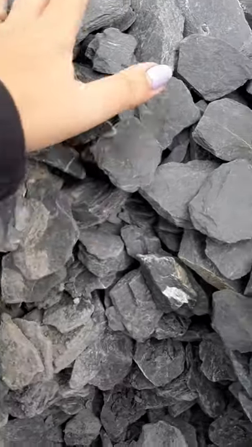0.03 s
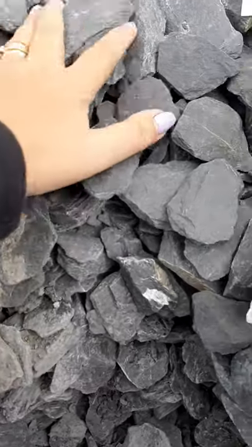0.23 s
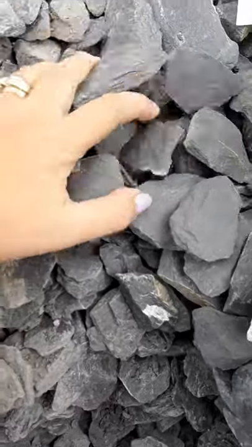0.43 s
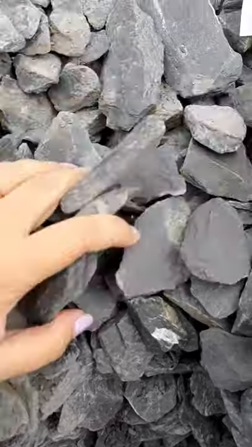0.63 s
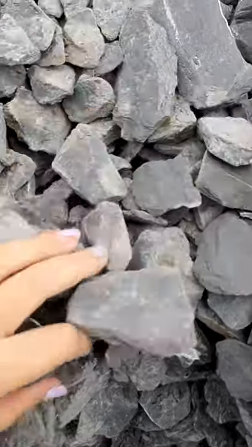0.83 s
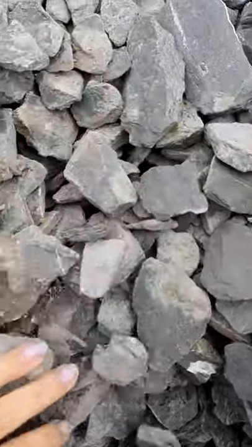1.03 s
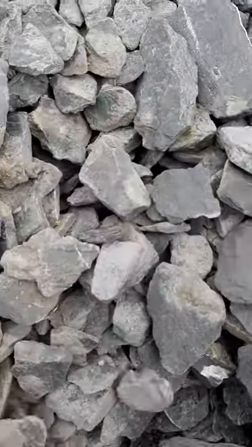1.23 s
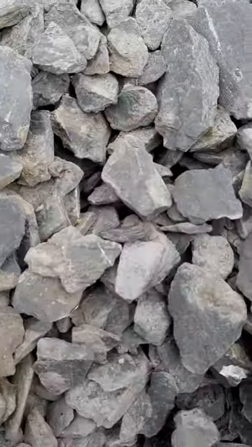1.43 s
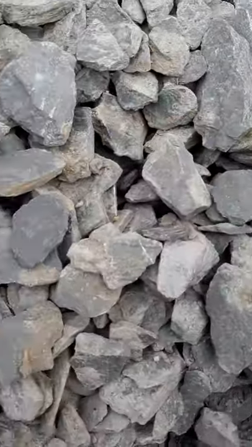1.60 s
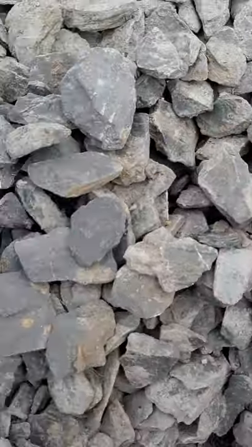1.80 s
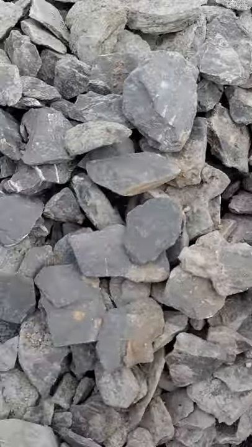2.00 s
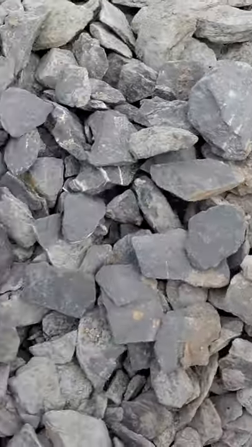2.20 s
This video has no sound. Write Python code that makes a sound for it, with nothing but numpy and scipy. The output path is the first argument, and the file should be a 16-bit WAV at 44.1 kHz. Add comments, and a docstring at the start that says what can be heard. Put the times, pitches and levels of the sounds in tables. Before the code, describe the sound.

Loose slate pieces clack, scrape and grind up close as a hand drags them down a pile outdoors. The last few tumble and settle with a soft scrape, leaving a low machine hum and faint hiss.

```python
"""A light tick of slate over a low machine hum and faint outdoor hiss; then, up close, a hand
drags loose chippings down a pile. Stone faces stick and slip in a grind of tiny contacts,
sliding edges squeak, and damped plates clack and chatter over the dull shifting of the pile.
A last few pieces tumble on and settle with a soft scrape, leaving the hum and the air."""
import sys
import numpy as np
from scipy import signal
from scipy.fft import rfft, irfft
from scipy.io import wavfile

SR = 44100
rng = np.random.default_rng(int(sys.argv[2]) if len(sys.argv) > 2 else 0)


def bounce(signal):
    """Save signal as a 16-bit WAV file at the path given by the first command-line argument."""
    frames = np.transpose(np.atleast_2d(signal))
    limited = np.clip(frames, -1, 1)
    pcm = np.round(limited * 32767).astype(np.int16)
    wavfile.write(sys.argv[1], SR, pcm)


N = 103635
TIME = np.arange(N) / SR

# The hand's drag down the pile: time_s, grit_db, dust_db, pan_db (left minus right)
DRAG = [(0, -76, -82, -11), (.178, -81, -56, 5), (.187, -48, -40, 6), (.27, -36, -41.5, 7),
        (.39, -50, -46.5, 5.5), (.455, -29, -36.5, 5), (.49, -37, -48, 7), (.54, -34.5, -36.5, 3.5),
        (.64, -38, -50, 1), (.71, -40, -46.5, 2.5), (.81, -37.5, -41, 3), (.885, -43, -45, 5.5),
        (.935, -39.5, -41, -1), (1.0, -42.5, -53, 3), (1.06, -35.5, -39.5, 4), (1.16, -40, -47, -1),
        (1.25, -49, -53, -4), (1.335, -40.5, -50, -3), (1.37, -51.5, -56, -1), (1.43, -48.5, -59, -3),
        (1.47, -57, -70, -5), (1.53, -45.5, -71, -6), (1.62, -62, -83, 2)]


def amp(db):
    """Decibels to gain."""
    return 10 ** (np.asarray(db) / 20)


def unit(x):
    """Scales to rms 1."""
    return x / np.sqrt(np.mean(x ** 2) + 1e-20)


def spectrum_at(points, hz):
    """Reads a spectrum table along a log-frequency axis."""
    point_hz, value = np.transpose(points)
    return np.interp(np.log(hz + 1), np.log(point_hz + 1), value)


def curve(points, column=1):
    """One column of a time table, drawn out to every sample."""
    table = np.transpose(points)
    return np.interp(TIME, table[0], table[column])


def pan(pan_db):
    """Left and right gains of mean power 1; positive leans left."""
    gains = amp(np.array([[.5], [-.5]]) * pan_db)
    return gains / np.sqrt((gains ** 2).mean(0))


def add(mix, start_s, sound):
    """Drops a stereo sound into the mix."""
    part = mix[:, max(round(start_s * SR), 0):][:, :sound.shape[1]]
    part += sound[:, :part.shape[1]]


def wander(rate_hz):
    """Random drift of rms 1, rolled off above the given rate."""
    hz = np.fft.rfftfreq(N, 1 / SR)
    return unit(irfft(rfft(rng.standard_normal(N)) / (1 + (hz / rate_hz) ** 4), N))


def colour(x, eq):
    """Shapes two channels with an EQ, drawing the upper bass towards mono."""
    # How alike the channels are: freq_hz, correlation
    likeness = [(30, 0), (130, 1), (300, 0.76), (700, 0.15), (1500, 0), (16000, 0)]
    hz = np.fft.rfftfreq(N, 1 / SR)
    same = spectrum_at(likeness, hz)
    left, right = rfft(x)
    right = same * left + np.sqrt(1 - same ** 2) * right
    return unit(irfft(np.array([left, right]) * amp(spectrum_at(eq, hz)), N))


def noise(eq):
    """Coloured stereo noise of rms 1."""
    return colour(rng.standard_normal((2, N)), eq)


def machine_hum():
    """A distant machine drones in low tones, each wavering in pitch and level."""
    # The machine's tones: pitch_hz, level_db
    tones = [(52, -74), (74.8, -49), (186, -63), (223, -70.5), (297, -86), (323, -70.5), (372.6, -64.5)]
    # Slow swell over all the tones: time_s, gain_db
    swell = [(0, 3), (.25, 4), (.65, 2), (1.0, -0.5), (1.5, -3), (2.1, -1.5), (2.35, 1.5)]
    hum = np.zeros(N)
    for hz, db in tones:
        peak = amp(db + .4 * wander(3)) * np.sqrt(2)
        cycles = np.cumsum(hz + .4 * wander(2.5)) / SR + rng.random()
        hum += peak * np.sin(2 * np.pi * cycles)
    return hum * amp(curve(swell))


def outdoor_air():
    """A steady low bed of air under a faint hiss that swells and dips."""
    # Colours of the air and the hiss: freq_hz, gain_db
    air_eq = [(20, -41), (38, -17), (60, 6.5), (115, -0.5), (200, -2), (450, -11), (900, -9), (1900, -8),
              (3000, -34), (16000, -70)]
    hiss_eq = [(200, 1.5), (800, 2.5), (2200, 4.5), (4500, -1.5), (7300, -5), (9000, -11.5), (13000, -10.5),
               (16000, -9)]
    # Rise and fall of the hiss: time_s, level_db
    hiss_level = [(0, -52.5), (.16, -49), (1.0, -49), (1.55, -53), (1.72, -62.5), (1.8, -65), (1.89, -58.5),
                  (1.95, -49), (2.06, -53), (2.17, -52), (2.29, -48.5), (2.35, -52)]
    return amp(-56.5) * noise(air_eq) + amp(curve(hiss_level)) * noise(hiss_eq)


def pile_shift():
    """The pile shifts under the hand with a dull rumble."""
    # Weight of the movement: time_s, level_db
    movement = [(0, -49.5), (.2, -54), (.255, -45), (.33, -51), (.47, -45.5), (.62, -49), (.85, -51.5),
                (1.0, -51), (1.09, -51), (1.2, -52.5), (1.55, -59), (1.69, -51.5), (1.78, -58),
                (2.35, -61.5)]
    # Colour of the rumble: freq_hz, gain_db
    rumble_eq = [(50, -11), (110, -4.5), (190, -1), (260, -3), (340, -9.5), (500, -13.5), (1000, -13.5),
                 (3000, -36)]
    return amp(curve(movement)) * noise(rumble_eq)


def minimum_phase(gain):
    """The sharpest-starting response with this magnitude."""
    log_gain = np.log(np.maximum(np.r_[gain, gain[-2:0:-1]], 1e-5))
    return np.exp(np.conj(signal.hilbert(log_gain)))[:len(gain)]


def clack(level_db, ring_hz, body_db, treble_db, pan_db, chatter_t60_s, size=4096):
    """One contact, its chatter and its scatter in the pile excite a heavily damped plate."""
    # Colour of struck slate: freq_hz, gain_db
    slate_eq = [(60, -20), (250, -15), (700, -18), (1300, -12), (2300, -6), (3600, 0.5), (5500, -1),
                (7800, -0.5), (9500, -10), (11300, -8), (13200, -11), (16000, -13.5)]
    # Modes of a plate: ratio to ring pitch, gain_db
    plate_modes = [(1, 10.5), (1.3, 5.5), (1.52, 0.5)]
    ring_width_hz, rise_s, scatter_t60_s, max_lag_s = 730, .002, .03, .0004
    t, hz = np.arange(size) / SR, np.fft.rfftfreq(size, 1 / SR)
    resonance = sum(amp(2 * db) / (1 + (2 * (hz - ratio * ring_hz) / ring_width_hz) ** 2)
                    for ratio, db in plate_modes)
    plate = amp(spectrum_at(slate_eq, hz)) * np.sqrt(1 + resonance)
    # Balance body and treble against the core of the clack.
    body, core, treble = (hz > 700) & (hz < 2500), (hz > 2500) & (hz < 8500), (hz > 9000) & (hz < 15500)
    low, mid, high = (10 * np.log10(np.mean(plate[band] ** 2)) for band in (body, core, treble))
    shelves = [(2000, body_db - low + mid), (3200, 0), (7800, 0), (9500, treble_db - high + mid)]
    plate *= amp(spectrum_at(shelves, hz))
    chatter, scatter = rng.standard_normal((2, 2, size)) * (1 - np.exp(-t / rise_s))
    chatter_gain = amp(1) * np.sqrt(chatter_t60_s / .0075)  # longer chatter carries more energy
    chatter = chatter_gain * unit(chatter * amp(-60 * t / chatter_t60_s))
    scatter = amp(-12.5) * unit(scatter * amp(-60 * t / scatter_t60_s))
    hit = (chatter + scatter) / np.sqrt(size)
    hit[:, 0] += pan(.59 * pan_db)[:, 0]  # the contact itself: a one-sample click
    struck = rfft(hit) * minimum_phase(plate)
    struck /= np.sqrt(2 * np.mean(abs(struck[:, core]) ** 2, axis=1, keepdims=True))
    # The far channel hears it a little late.
    lag_s = np.maximum(np.array([[-1], [1]]) * np.clip(pan_db / 8, -1, 1) * max_lag_s, 0)
    delay = np.exp(-2j * np.pi * hz * np.round(lag_s * SR) / SR)
    return amp(level_db) * pan(pan_db) * irfft(struck * delay)


def clacks():
    """Chippings knock together, crowding during the drag and thinning out after it."""
    # Slate hitting slate: start_s, level_db, ring_hz, body_db, treble_db, pan_db, chatter_t60_s
    knocks = [(0.0279, -14, 6860, 1.5, -15, -10, 0.01), (0.2568, -7, 4900, -2, -18, 9, 0.0062),
              (0.2619, 6, 3500, -0.5, -23, 7, 0.01), (0.2992, -6.5, 4300, 0, -14, 4, 0.0068),
              (0.42, -2.5, 3570, 2.5, -20, 3, 0.023), (0.4399, 11.5, 3800, -7.5, -14, 6, 0.01),
              (0.449, 14.5, 6130, -16, -17.5, 10.5, 0.007), (0.458, 3, 4390, -9, -15, 13, 0.017),
              (0.4623, -11, 3660, -10, -14, 12, 0.021), (0.4684, -4, 2770, -11, -16, 7, 0.029),
              (0.506, 11, 5100, -7.5, -19, 8, 0.0072), (0.5222, 0.5, 4430, -11, -14, 5.5, 0.021),
              (0.5497, 4, 3560, -6, -25, 0, 0.011), (0.573, -2.5, 4830, -6, 2, 2.5, 0.012),
              (0.5946, 5.5, 5430, -11, -12, 6, 0.012), (0.606, 0, 5150, -6, -18, 5, 0.0098),
              (0.61, 4, 6330, -12, -14, 9, 0.012), (0.6336, 4, 4700, -2, -11, 5, 0.034),
              (0.6528, 6.5, 6100, -8, -17, 2, 0.0085), (0.6888, 2, 4270, -13.5, -7, 5.5, 0.017),
              (0.693, 7, 7540, -20, -11, 4.5, 0.0064), (0.7359, 0, 3800, -16, -15, 3, 0.051),
              (0.7745, 1.5, 3750, -7.5, -18, 11, 0.007), (0.797, 0, 5340, -25, -8, 5, 0.014),
              (0.803, 5, 5800, -27, -15, 8, 0.16), (0.8095, 0, 6040, -22, -21, 9, 0.005),
              (0.8284, 6, 4370, -21, -28, 4.5, 0.0067), (0.852, 1, 4140, -21, -26, 3, 0.019),
              (0.872, -8, 4500, -12, -23, 10, 0.015), (0.906, -9, 3940, -17, 6, 12, 0.066),
              (0.918, 10, 4860, -23, -9, 5.5, 0.01), (0.9303, 13, 4270, -12.5, -14, 7, 0.011),
              (0.9376, 1, 3900, -15, -20, 7.5, 0.0088), (0.9622, -0.5, 3730, -1, -3, 14, 0.0045),
              (0.963, 13.5, 3630, -3, -10.5, 5, 0.0091), (0.9827, -1, 5900, -22, -14, 5, 0.023),
              (0.9937, 2, 4820, -9, -17, 10, 0.0065), (1.0157, -1, 5200, -14, -11, 5.5, 0.014),
              (1.0277, -5.5, 7450, -1, 0, 7, 0.014), (1.0475, -0.5, 4910, -9, -10, 7, 0.019),
              (1.055, 9.5, 3980, -6, -13, -3, 0.014), (1.0937, 3, 4220, -9, -12, -5, 0.016),
              (1.101, 3.5, 4000, -9, -4, 1, 0.023), (1.1053, 8.5, 4550, -1.5, -22, -1.5, 0.0078),
              (1.1197, 1, 4200, -8, -14, 2, 0.008), (1.131, 9, 4420, -14.5, -16, -2, 0.0076),
              (1.183, -1.5, 3840, -15, -17, 0.5, 0.022), (1.2173, -1, 7400, -11, -10.5, 2.5, 0.094),
              (1.242, 0.5, 5210, -10, -25, -1.5, 0.013), (1.2497, 6, 5400, -10.5, -24, -2.5, 0.0052),
              (1.2717, 5, 4700, -4.5, -14, 1, 0.012), (1.2884, 11, 5600, -17.5, -12, -2.5, 0.011),
              (1.3179, -3.5, 4760, -1, -22, -1, 0.0091), (1.3273, 1, 4460, -8.5, -26, -2.5, 0.013),
              (1.33, -1.5, 4460, -9, -15, -0.5, 0.021), (1.3946, -8, 3970, 2, -21, -4.5, 0.023),
              (1.4073, -2.5, 3680, -3.5, -19, 1, 0.011), (1.4181, -7, 4470, -3, -14, 1, 0.015),
              (1.4343, -8.5, 2860, 3.5, -10, 1.5, 0.013), (1.4411, -5.5, 4300, -3.5, -13, -1, 0.019),
              (1.47, -14, 4800, -10, -9, -2, 0.008), (1.4813, -1, 4500, -9, -14, -3, 0.008),
              (1.493, -6.5, 4350, -10, -22, 2, 0.014), (1.501, 6.5, 4970, -11, -14.5, -3.5, 0.012),
              (1.5114, -6, 4030, -5, -22, -1, 0.0067), (1.5233, 1.5, 5600, -18, -22, 0, 0.0069),
              (1.526, -5, 4500, -24, -18, -5, 0.019), (1.5429, 5.5, 6100, -14, -13.5, -4, 0.005),
              (1.5603, 0, 4600, -20, -10.5, 0.5, 0.009), (1.567, -11, 4140, -9, -15, -3, 0.014),
              (1.5833, -15, 4600, -10, -15, -5, 0.008), (1.5947, -4, 4570, -11, -16, -4, 0.022),
              (1.7151, -18, 6850, 8, -8.5, -3.5, 0.031)]
    out = np.zeros((2, N))
    for start_s, *knock in knocks:
        add(out, start_s, clack(*knock))
    return out


def rub(eq, start_s, length_s, level_db):
    """Soft friction: one arch of coloured noise."""
    return amp(level_db) * np.sin(np.pi * np.clip((TIME - start_s) / length_s, 0, 1)) * noise(eq)


def hand_rub():
    """The hand brushes the slate as it takes hold."""
    # Colour of the hand on stone: freq_hz, gain_db
    hand_eq = [(400, -9), (1100, -12), (1900, 0.5), (2400, -1.5), (3500, -11), (5000, -7), (8000, -25)]
    return rub(hand_eq, start_s=.17, length_s=.23, level_db=-40.5)


def grains(per_s=2500, spread_db=3.1, t60_s=.007, size=256):
    """A dense train of tiny contacts, each scattered briefly among the stones."""
    out, t = np.zeros((2, N)), np.arange(size) / SR
    strength = amp(spread_db * np.minimum(rng.exponential(1, N), 4))
    contacts = strength * (rng.random(N) < per_s / SR)
    stones = rng.standard_normal((24, 2, size)) * amp(-60 * t / t60_s)
    which = rng.integers(0, len(stones), N)
    for k, stone in enumerate(stones):
        out += signal.oaconvolve((contacts * (which == k))[None], stone, axes=1)[:, :N]
    return out


def grinding(slip_db=1.5, slip_hz=70):
    """Faces stick and slip over each other: coarse grit, with fine dust further left."""
    # Colours of the grit and the dust: freq_hz, gain_db
    grit_eq = [(300, -14), (600, -20), (1200, -7), (2200, -3.5), (3200, 0.5), (4100, 5), (5500, -2),
               (7800, -5.5), (9200, -19), (12000, -48), (16000, -48)]
    dust_eq = [(3000, -27), (8000, -7), (10200, -8), (11350, 1.5), (12200, -2), (13200, -2.5),
               (14500, -6.5), (16000, -3)]
    slip = unit(amp(slip_db * wander(slip_hz)))
    pan_db = curve(DRAG, column=3)
    grit = colour(grains(), grit_eq) * amp(curve(DRAG, column=1)) * pan(pan_db)
    dust = colour(grains(), dust_eq) * amp(curve(DRAG, column=2)) * pan(pan_db + 8.5)
    return slip * (grit + dust)


def squeaks(q=40, sway_depth=.006, flutter_db=2.4, flutter_hz=55):
    """A sliding edge drives a narrow resonance that sways and flutters as it sticks and slips."""
    # Edges sliding: start_s, length_s, pitch_hz, level_db
    slides = [(0.186, 0.06, 1815, -49.5), (0.232, 0.031, 2490, -41), (0.257, 0.045, 8320, -46.5),
              (0.319, 0.055, 8400, -45), (0.407, 0.021, 8350, -35.5), (0.423, 0.012, 8100, -41),
              (.455, 0.015, 8200, -39), (.505, 0.013, 8260, -32.5), (0.238, 0.06, 13260, -42),
              (0.446, 0.032, 13050, -36), (0.65, 0.019, 13000, -41), (0.723, .028, 11350, -41.5),
              (0.729, 0.071, 13200, -45), (0.86, 0.017, 11250, -43), (0.887, 0.23, 13200, -50),
              (.885, 0.34, 11330, -53.5), (0.982, 0.017, 11400, -47), (1.053, 0.013, 11560, -38.5),
              (1.089, .025, 11250, -40), (1.141, 0.017, 11140, -43), (1.181, 0.014, 11250, -43),
              (1.192, .035, 13130, -46), (1.224, 0.11, 13300, -54)]
    out = np.zeros((2, N))
    sway = 1 + sway_depth * wander(flutter_hz)
    flutter = amp(flutter_db * wander(flutter_hz))
    for start_s, length_s, hz, db in slides:
        span = round(start_s * SR) + np.arange(round(length_s * SR))
        pole = np.exp(-np.pi * hz / q / SR)
        friction = rng.standard_normal((2, SR // 2)) + 1j * rng.standard_normal((2, SR // 2))
        narrow_band = signal.lfilter([1], np.poly([pole, pole]), friction)[:, -len(span):]
        carrier = np.exp(2j * np.pi * np.cumsum(hz * sway[span]) / SR)
        ring = flutter[span] * (narrow_band * carrier).real
        fade = signal.windows.tukey(len(span), .6)
        add(out, start_s, amp(db) * np.array([unit(side) for side in ring]) * fade)
    return out * pan(curve(DRAG, column=3) + 4)


def large_plates():
    """The larger plates thud or ring, each in quickly damped modes of its own."""
    # Plate strikes: start_s, pan_db, modes as (pitch_hz, level_db, t60_s)
    strikes = [(.244, 0, [(242, -34, .1)]), (.2625, 7, [(3680, -17, 0.011), (4900, -17, 0.011)]),
               (.9633, -1, [(1160, -32.5, 0.02), (2180, -28, 0.01), (2900, -22, 0.013),
               (3690, -13.5, 0.016), (4900, -13, .012), (5500, -15.5, 0.019), (11050, -12.5, 0.0054)]),
               (1.1052, 3, [(557, -32.5, 0.038), (1320, -26, 0.018), (2150, -23, 0.0067),
               (11050, -29, 0.012)]), (1.2722, -2, [(4940, -24, 0.014), (7600, -24, .008)]),
               (1.2892, -11, [(4370, -26, .014), (5760, -9.5, .012), (6980, -21, .012), (7240, -23, .012)]),
               (1.5431, -4, [(4650, -12, 0.0076), (5300, -18, 0.0092)])]
    out, t = np.zeros((2, N)), np.arange(SR // 5) / SR
    for start_s, pan_db, modes in strikes:
        for hz, db, t60_s in modes:
            phase = np.array([[0], [rng.uniform(-1.27, 1) * np.pi / 2]])  # channels out of step
            envelope = amp(db - 60 * t / t60_s) * (1 - np.exp(-t * hz)) ** 2
            add(out, start_s, pan(pan_db) * envelope * np.sin(2 * np.pi * hz * t + phase))
    return out


def settling():
    """The last plate slides to rest with a dull scrape."""
    # Colour of the scrape: freq_hz, gain_db
    scrape_eq = [(150, -16), (420, -4), (900, -6), (1800, -7), (3000, -16), (8000, -34)]
    return rub(scrape_eq, start_s=1.64, length_s=.15, level_db=-52)


def scene():
    """Impacts and friction up front; the shifting pile, hum and air underneath."""
    impacts = clacks() + large_plates()
    friction = hand_rub() + settling() + grinding() + squeaks()
    return impacts + friction + pile_shift() + machine_hum() + outdoor_air()


def record(dry, low_cut_hz=27, high_cut_hz=15850):
    """Microphone low cut, a clip at full scale and a steep high cut."""
    heard = signal.sosfilt(signal.butter(2, low_cut_hz, "high", fs=SR, output="sos"), dry)
    high_cut = signal.firwin(601, high_cut_hz, window=("kaiser", 9), fs=SR)
    return signal.oaconvolve(np.clip(heard, -1, 1), high_cut[None], "same")


dry = scene()
out = record(dry)
bounce(out)
```